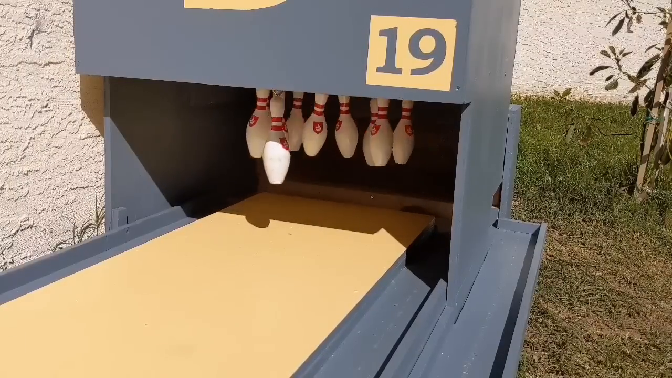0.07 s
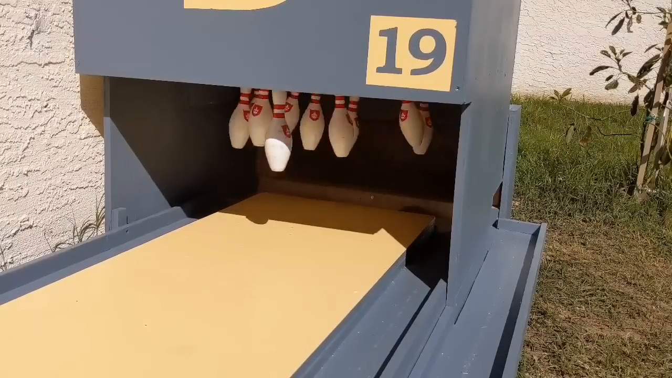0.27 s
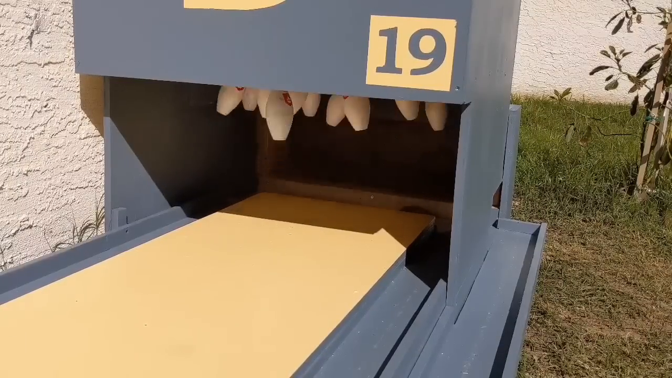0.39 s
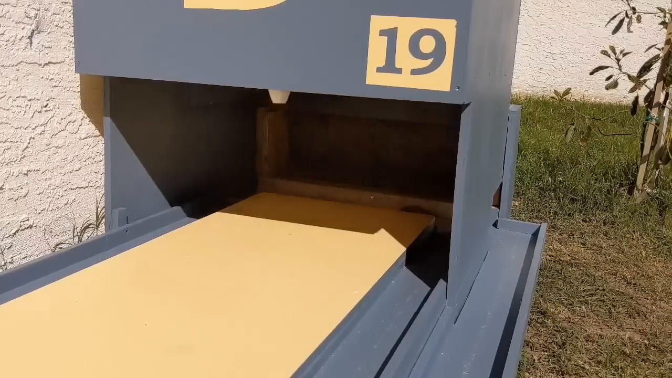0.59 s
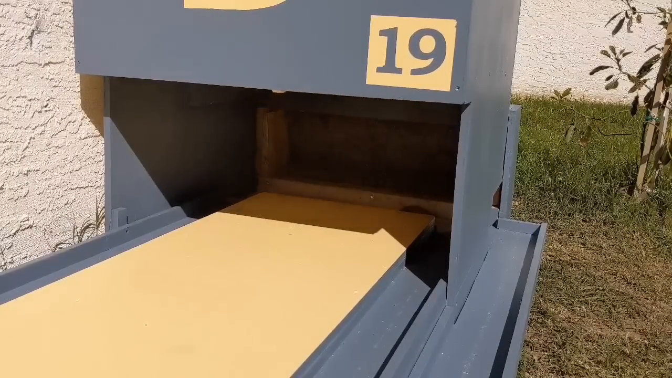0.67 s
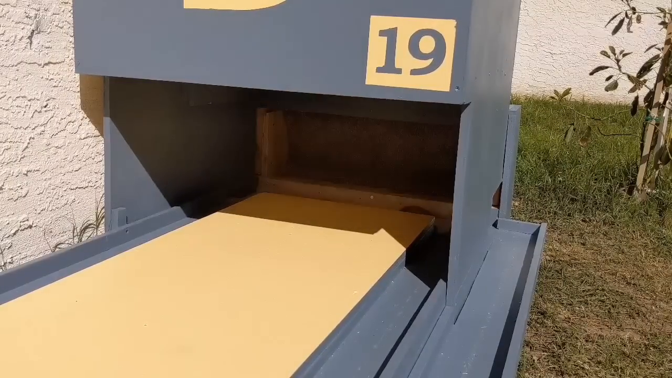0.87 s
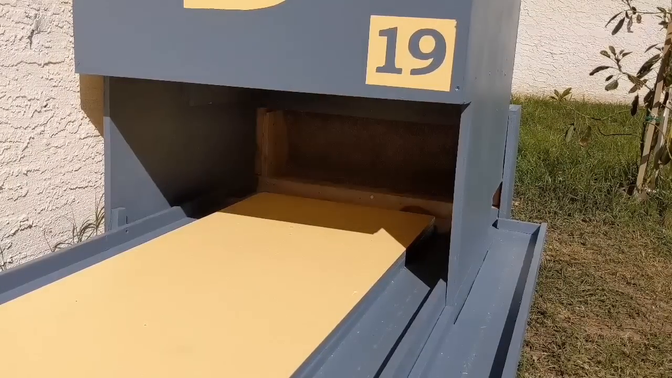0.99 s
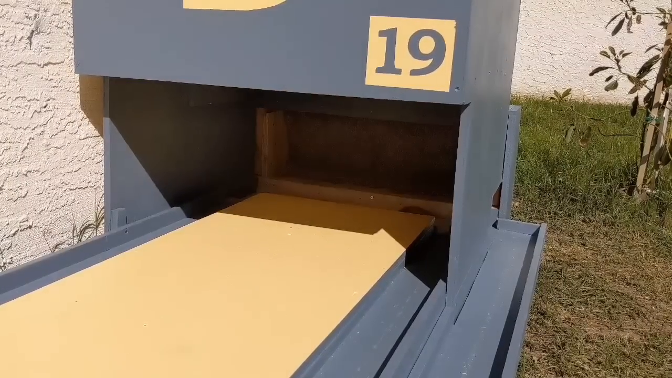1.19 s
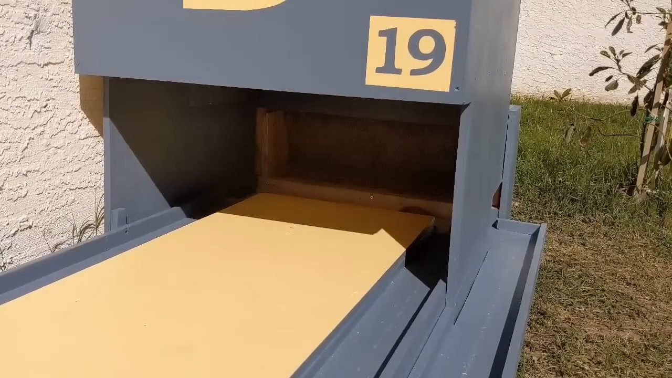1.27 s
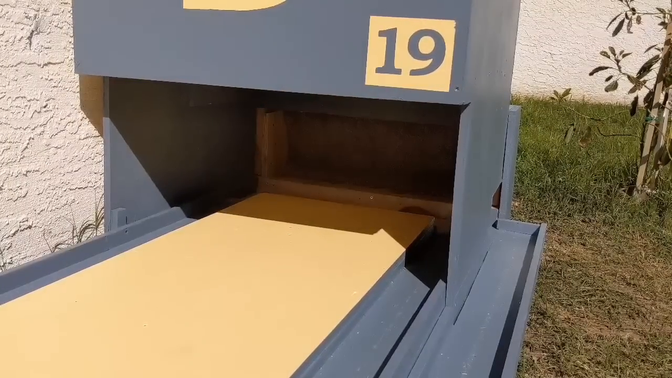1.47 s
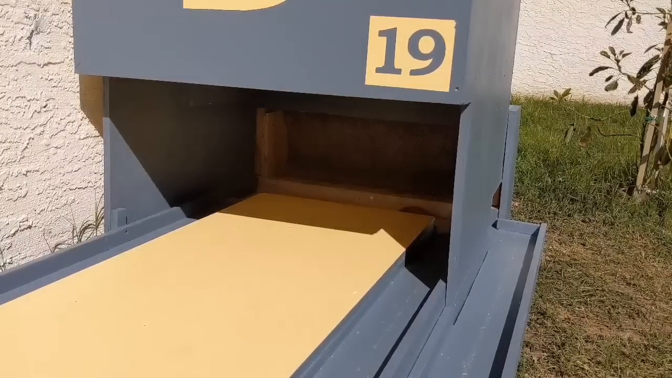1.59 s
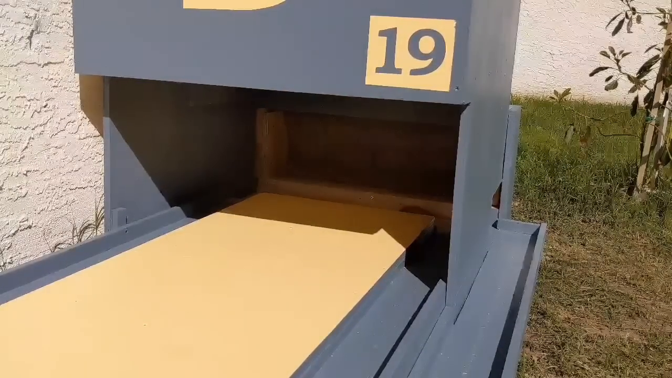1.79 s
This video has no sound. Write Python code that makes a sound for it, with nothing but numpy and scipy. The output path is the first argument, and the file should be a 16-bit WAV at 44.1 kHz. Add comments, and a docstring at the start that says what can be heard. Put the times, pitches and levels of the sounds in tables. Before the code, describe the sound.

Wooden bowling pins clack together as strings haul them up, then bump heavily into a booming plywood box. The strings squeak and squeal briefly, and hollow knocks fade as the pins settle, over a low outdoor rumble.

```python
"""Wooden bowling pins are hauled up on strings into a plywood box at the end of an outdoor lane.
Over a low rumble and faint open air, the pins first clack together, lightly and then hard.
Next they bump heavily into the rack and set the box booming, while the strings squeak in their guides
and the first hollow knocks sound. After about a second, one string squeals at the end of the haul.
Last come fading knocks and bumps as the pins settle."""
import sys
import numpy as np
from scipy import signal
from scipy.fft import rfft, irfft
from scipy.io import wavfile
from scipy.ndimage import uniform_filter1d

SR = 44100
rng = np.random.default_rng(int(sys.argv[2]) if len(sys.argv) > 2 else 0)


def wav_out(sig):
    """Save sig, one row per channel (or a flat mono array), as 16-bit PCM at SR to the path in sys.argv[1]."""
    wavfile.write(sys.argv[1], SR, np.round(np.clip(np.atleast_2d(sig).T, -1, 1) * 32767).astype(np.int16))


N = 81585
T = np.arange(int(.4 * SR)) / SR  # seconds since the start of one short sound

# Levels in the tables are relative. A fade_s is the time a sound takes to drop by 60 dB.
# rumble and hiss of the open air: frequency_hz, level_db
AIR_COLOUR = [(25, -4), (55, 2.5), (80, -1), (150, -2), (250, -10), (400, -20.5), (520, -28), (700, -24.5),
              (1500, -29.5), (2400, -25.5), (3400, -34), (4200, -33), (6000, -42.5), (10000, -43.5),
              (15800, -59)]
# the box swaying as the pins' weight arrives: start_s, length_s, level_db, pitch_hz
SWAYS = [(0.039, 0.22, -47, 58.8), (0.493, 0.1, -15, 53), (0.689, 0.154, -16, 72.1),
         (1.028, 0.13, -20.5, 63.9)]
# course of the long string squeal: time_s, pitch_hz, harmonic_1_db, harmonic_2_db, harmonic_3_db
SQUEAL_PATH = [(1.025, 2370, -42, -59, -69), (1.052, 2370, -39, -45.5, -55), (1.091, 2420, -29, -56, -52.5),
               (1.111, 2455, -40, -47, -54), (1.13, 2465, -40, -54, -64), (1.148, 2485, -46, -47, -58),
               (1.171, 2468, -40, -45, -43.5), (1.19, 2470, -42, -44, -57), (1.21, 2467, -38, -64, -64),
               (1.291, 2468, -48.5, -78, -71), (1.377, 2465, -44, -70, -79)]
# short string squeaks: start_s, swell_s, fade_s, level_db, base_pitch_hz
SQUEAKS = [(0.404, 0.0057, 0.053, -21.5, 2230), (0.583, 0.0064, 0.12, -33.5, 2520),
           (0.641, 0.0098, 0.054, -17.5, 2360), (0.665, 0.0051, 0.12, -24.5, 2210)]
# overtones of a squeak: multiple_of_base_pitch, level_db
SQUEAK_HARMONICS = [(2, -1), (3, -19), (4, -14.5), (5, -24), (6, -23)]
# hollow knocks of pins settling: start_s, level_db, settled_pitch_hz, fade_s
KNOCKS = [(0.253, -35, 517, 0.24), (0.401, -6.5, 499.5, 0.084), (0.661, -10.5, 479.5, 0.058),
          (.713, -8, 491, 0.07), (.916, -9, 484, 0.1), (1.02, -7.5, 495.3, 0.098), (1.232, -17, 491, 0.13),
          (1.342, -35, 523, 0.037), (1.357, -15.5, 498.6, 0.13), (1.5405, -16.5, 506, 0.1),
          (1.769, -32, 515, 0.11)]
# tones in a knock's note: multiple_of_pitch, level_db
KNOCK_TONES = [(1, 14.5), (1.17, -13), (1.98, -15), (2.15, -14), (2.45, -39)]
# noise of the blow that starts a knock: frequency_hz, level_db
BLOW_COLOUR = [(100, 5.5), (330, 5), (600, -7), (800, -5), (1050, -5.5), (1400, -16.5), (2000, -50),
               (4500, -31.5), (8000, -41), (15000, -41)]
# faint high tick of a knock: pitch_hz, level_db, fade_s
TICK_TONES = [(4380, 5, 0.11), (7300, -3.5, 0.11), (8200, -4, 0.13)]
# pins bumping the rack and the box: start_s, thud_db, boom_db
BUMPS = [(.012, -40, -22.5), (0.085, -44.5, -20.5), (0.206, -42, -19.5), (0.31, -27, -22),
         (0.344, -28, -15.5), (0.405, -41, -18), (.452, -18, -18), (.477, -10, -12.5), (.496, -11, -23),
         (.521, -12, -15), (.546, -19, -16), (.574, -21, -14.5), (.635, -26.5, -28), (0.647, -12, -29),
         (0.656, -14, -7.5), (0.733, -13, -11), (0.75, -21, -29), (.774, -12, -20), (0.799, -16, -4),
         (.833, -10.5, -34), (0.856, -16, -7), (.915, -16, -14.5), (0.95, -24.5, -9), (1.047, -21.5, -13.5),
         (1.087, -25.5, -11.5), (1.114, -29, -12), (1.152, -19, -51), (1.185, -18.5, -17),
         (1.221, -24.5, -11), (1.275, -31.5, -16), (1.343, -27, -28), (1.401, -28, -15),
         (1.478, -37.5, -34), (1.552, -46, -22), (1.62, -27.5, -24.5), (1.7, -37, -58), (1.717, -36.5, -42)]
# noise of a thud inside the box: frequency_hz, level_db
THUD_COLOUR = [(60, 1.5), (130, -4), (200, -7.5), (330, 4), (520, -1.5), (700, -13.5), (1100, -20.5),
               (1600, -33), (4000, -47)]
# ring of the rack and box panels: pitch_hz, level_db, fade_s
PANEL_TONES = [(220.8, -7.5, 0.49), (235.7, -6, 0.44), (309.1, -10, 0.48), (367, -5.5, 0.27),
               (404, -6.5, 0.072), (446, -13.5, 0.15), (494.2, 0, 0.2), (590.7, -5.5, 0.19),
               (709, -17, 0.23)]
# boom of the whole box: pitch_hz, level_db, fade_s
BOX_TONES = [(49.6, -3, 0.041), (67.8, 0, 0.58), (88.8, 11, 0.18), (122.7, 5, 0.22)]
# pin hitting pin: start_s, level_db, brightness_db_per_octave, fade_s, band_hz, band_lift_db
CLACKS = [(0.088, -33, 2.5, 0.11, 1160, 18.5), (0.158, -32.5, 2.5, 0.09, 3200, 12),
          (0.195, -38, -5.5, 0.095, 1920, 5), (0.253, -28.5, -4.5, 0.24, 1500, 9.5),
          (0.306, -32.5, -0.5, 0.094, 9400, -4), (0.3247, -15.5, 0, 0.11, 4660, 3),
          (.352, -24, -1.5, 0.32, 4070, 5), (.365, -20, -1.5, 0.16, 1520, 4.5),
          (0.393, -23, 1.5, 0.21, 3080, 2.5), (.403, -21.5, -0.5, 0.19, 8500, 2),
          (0.451, -23.5, -0.5, 0.36, 4080, 6), (.482, -20, -1.5, 0.28, 840, 9),
          (0.521, -23.5, 2.5, 0.099, 3860, 5), (.545, -26, -5, 0.046, 7750, 11),
          (.574, -26.5, -4, 0.22, 4840, 10), (0.634, -27, 3, 0.12, 4600, 10),
          (0.645, -22, -4, 0.14, 13200, 10.5), (0.668, -39, 1.5, 0.34, 8300, -3),
          (.714, -26.5, -0.5, 0.24, 1470, 2.5), (.729, -24.5, -3, 0.25, 5200, 8.5),
          (.74, -21, -5, 0.047, 1120, 18), (.773, -20.5, -3, 0.2, 810, 11),
          (0.796, -32.5, 1.5, 0.23, 3830, 6), (.834, -26.5, -2, 0.22, 1130, 7.5),
          (0.916, -36.5, -4, 0.26, 1330, -1), (0.986, -37.5, -4.5, 0.22, 3370, 4),
          (1.181, -37, -3, 0.087, 4500, 1.5), (1.399, -39, -1.5, 0.064, 2080, 10),
          (1.62, -48, -3, 0.077, 2240, 18)]
# noise of the crack that starts a clack: frequency_hz, level_db
CRACK_COLOUR = [(300, -21.5), (700, 1.5), (1000, 0), (1600, -2.5), (2400, 0), (4300, -5), (6000, -8),
                (9000, -9), (15500, -21.5)]
# ring of a wooden pin: pitch_hz, level_db, fade_s
PIN_TONES = [(844, -0.5, 0.074), (1057, -1, 0.044), (1358, -9, 0.097), (1907, -6, 0.098), (2187, -1, 0.067),
             (2390, -4, 0.093), (2560, -10.5, 0.18), (3005, -7.5, 0.076), (3970, 3, 0.055),
             (4310, -9, 0.092), (5320, -5, 0.085), (7340, -11.5, 0.13)]
# how alike the two ears' sounds are: frequency_hz, likeness (0 unrelated, 1 the same)
EAR_LIKENESS = [(60, 1), (200, 0.65), (500, 1), (1000, 0.73), (2000, 0.057), (5000, 0.12), (15000, 0.065)]
# how much louder the left side is: frequency_hz, left_minus_right_db
LEFT_LEAN = [(60, 3.3), (200, 3.4), (500, 2.4), (1000, 3), (2000, 1.8), (4000, 3.2), (12000, 2)]

SIDES = np.array([[.5], [-.5]])  # shares a difference between left and right


def amp(db):
    """Turns decibels into a number to multiply a sound by."""
    return 10 ** (np.asarray(db) / 20)


def unit(x):
    """Scales a signal to an average strength (rms) of 1."""
    return x / np.sqrt(np.mean(x ** 2) + 1e-20)


def read(points, hz):
    """Looks up a frequency in a table, gliding between rows on an octave scale."""
    row_hz, value = np.transpose(points)
    return np.interp(np.log(hz + 1), np.log(row_hz + 1), value)


def add(mix, start_s, sound):
    """Mixes a sound in at its start time."""
    part = mix[:, max(round(start_s * SR), 0):][:, :sound.shape[-1]]
    part += sound[..., :part.shape[1]]


def dying(rise_s, fade_s):
    """The loudness of something struck: a quick rise, then a steady fade."""
    return np.minimum(T / rise_s, 1) * amp(-60 * T / fade_s)


def wobble(shape, samples):
    """A random wiggle; smoothing over more samples makes it slower."""
    return unit(uniform_filter1d(rng.standard_normal(shape), size=samples))


def noise(colour, size, shade=lambda hz: 0):
    """Stereo noise whose colour sets each frequency's level; the ears are alike mainly in the bass."""
    hz = np.fft.rfftfreq(size, 1 / SR)
    left, other = np.exp(2j * np.pi * rng.random((2, len(hz))))
    same = read(EAR_LIKENESS, hz)
    right = same * left + np.sqrt(1 - same ** 2) * other
    return unit(irfft(np.array([left, right]) * amp(read(colour, hz) + shade(hz + 1)), size))


def ring(tones, rise_s, vary_db, clock=T):
    """A struck object rings; each blow mixes its tones anew, and high ones reach the ears out of step."""
    out = np.zeros((2, len(T)))
    for (hz, db, fade_s), (weight, side) in zip(tones, rng.standard_normal((len(tones), 2))):
        ear_shift = np.arccos(read(EAR_LIKENESS, hz)) * np.sign(side) * SIDES
        tone = np.sin(2 * np.pi * hz * clock + ear_shift)
        out += amp(db + vary_db * weight) * dying(rise_s, fade_s) * tone
    return out / np.sqrt(sum(amp(db) ** 2 for _, db, _ in tones) / 2)


def slipping(hz, jitter):
    """A string sticks and slips: gives the phase (place in the wave) of a tone with trembling pitch."""
    return 2 * np.pi * np.cumsum(hz * (1 + jitter * wobble(len(hz), samples=24))) / SR


def walls(sound, count=6, longest_s=.012):
    """A few quick echoes bounce off the walls of the box, different for each ear."""
    echoes = np.zeros((2, len(T)))
    echoes[:, 0] = 1  # the direct sound
    for ear in echoes:
        delays = (rng.uniform(.1, 1, count) * longest_s * SR).astype(int)
        ear[delays] += .17 * rng.choice([-1, 1], count)
    return signal.fftconvolve(sound, echoes / np.linalg.norm(echoes[0]), axes=1)[:, :N]


def air():
    """Low rumble and faint hiss of the open air."""
    return amp(-34) * noise(AIR_COLOUR, N)


def box_sways():
    """The box flexes under the load: a few waves of deep bass that swell and fade."""
    out = np.zeros((2, N))
    for start_s, length_s, db, hz in SWAYS:
        t = np.arange(0, length_s, 1 / SR)
        swell = np.sin(np.pi * t / length_s)
        add(out, start_s, amp(db) * np.sqrt(2) * swell * np.sin(2 * np.pi * hz * t))
    return out


def string_squeal(right_lag_s=.00016, left_minus_right_db=-.5):
    """A string squeals over its guide at the end of the haul, rasping and catching as it runs."""
    times, hz, *levels = np.transpose(SQUEAL_PATH)
    t = np.arange(times[0], times[-1], 1 / SR)
    pitch = np.interp(t, times, hz)
    phase = slipping(pitch, jitter=.007) - 2 * np.pi * pitch * np.array([[0], [right_lag_s]])
    tone = sum(np.sqrt(2) * amp(np.interp(t, times, db)) * np.sin(multiple * phase)
               for multiple, db in enumerate(levels, 1))
    flutter = amp(4.5 * wobble(tone.shape, samples=400))
    rasp = 1 + .33 * wobble(tone.shape, samples=70)
    out = np.zeros((2, N))
    add(out, times[0], tone * unit(flutter * rasp) * amp(left_minus_right_db * SIDES))
    return out


def string_squeaks():
    """Tight strings slip briefly in their guides: each squeak swells and dies away."""
    out = np.zeros((2, N))
    for start_s, swell_s, fade_s, db, hz in SQUEAKS:
        phase = np.array([slipping(np.full(len(T), hz), jitter=.028) for _ in range(2)])
        tone = unit(sum(amp(level) * np.sin(multiple * phase) for multiple, level in SQUEAK_HARMONICS))
        swell = np.minimum(T / swell_s, 1)
        fade = amp(-60 * np.maximum(T - swell_s, 0) / fade_s)
        add(out, start_s, amp(db) * swell * fade * tone)
    return out


def settling_knocks(rise_s=.0055, settle_s=.0082):
    """A pin settles into place: a short wooden blow, a faint tick and a hollow note that dips in pitch."""
    out = np.zeros((2, N))
    clock = np.cumsum(1 + .072 * np.exp(-T / settle_s)) / SR  # runs fast at first: the note starts high
    for start_s, db, hz, fade_s in KNOCKS:
        tones = [(hz * multiple, level, fade_s) for multiple, level in KNOCK_TONES]
        note = ring(tones, rise_s, vary_db=1.5, clock=clock)
        blow = amp(-9.5) * noise(BLOW_COLOUR, len(T)) * dying(rise_s=.002, fade_s=.12)
        add(out, start_s, amp(db) * (note + blow))
        tick_db = -40 + .66 * db  # follows the knock's level only in part
        add(out, start_s, amp(tick_db) * ring(TICK_TONES, rise_s, vary_db=1.5))
    return out


def rack_bumps():
    """Pins hit the rack: a dull thud, ringing panels and the boom of the box."""
    out = np.zeros((2, N))
    for start_s, thud_db, boom_db in BUMPS:
        thud = amp(1) * noise(THUD_COLOUR, len(T)) * dying(rise_s=.002, fade_s=.17)
        panels = amp(-4.5) * ring(PANEL_TONES, rise_s=.002, vary_db=4)
        boom = amp(-3.5) * ring(BOX_TONES, rise_s=.0053, vary_db=3.5)
        add(out, start_s, amp(thud_db) * (thud + panels) + amp(boom_db) * boom)
    return out


def pin_clacks(rise_s=.0022, treble_hz=7050, band_octaves=.27):
    """Pins strike each other: a hard crack whose treble dies first, and the ring of the wood."""
    cracks, rings = np.zeros((2, 2, N))
    cut_treble = signal.butter(2, treble_hz, fs=SR, output="sos")
    for start_s, db, brightness, fade_s, band_hz, lift_db in CLACKS:
        def shade(hz):
            """This clack's own colour in dB: brighter or duller, with one band raised or lowered."""
            octaves = np.log2(hz / band_hz)
            return brightness * octaves + lift_db * np.exp(-.5 * (octaves / band_octaves) ** 2)
        chatter = amp(2.5 * wobble(len(T), samples=130))  # the pins rattle within one clack
        burst = noise(CRACK_COLOUR, len(T), shade) * unit(chatter)
        body = signal.sosfiltfilt(cut_treble, burst)
        treble = burst - body
        crack = body * dying(rise_s, fade_s) + treble * dying(rise_s, .62 * fade_s)
        add(cracks, start_s, amp(db + 2.5) * crack)
        tuning = 1 + .008 * rng.uniform(-1.3, 1, len(PIN_TONES))  # no two pins are quite alike
        tones = [(hz * tune, level + shade(hz), fade)
                 for (hz, level, fade), tune in zip(PIN_TONES, tuning)]
        add(rings, start_s, amp(db - 1) * ring(tones, rise_s, vary_db=5))
    return walls(cracks) + rings


def scene():
    """The pins, the box and the strings sound together in the open air."""
    pins_and_box = pin_clacks() + rack_bumps() + box_sways() + settling_knocks()
    return pins_and_box + string_squeaks() + string_squeal() + air()


def record(dry, lowest_hz=40, highest_hz=15850, ceiling=.95):
    """The microphones lean left, drop the deepest bass, round off peaks and cut the highest treble."""
    hz = np.fft.rfftfreq(2 * N, 1 / SR)
    leaned = irfft(rfft(dry, 2 * N) * amp(read(LEFT_LEAN, hz) * SIDES))[:, :N]
    thinned = signal.sosfilt(signal.butter(6, lowest_hz, "high", fs=SR, output="sos"), leaned)
    rounded = thinned / (1 + (thinned / ceiling) ** 6) ** (1 / 6)
    cut_treble = signal.firwin(511, highest_hz, window=("kaiser", 9), fs=SR)
    return signal.oaconvolve(rounded, cut_treble[None], "same")


dry = scene()
out = record(dry)
wav_out(out)
```